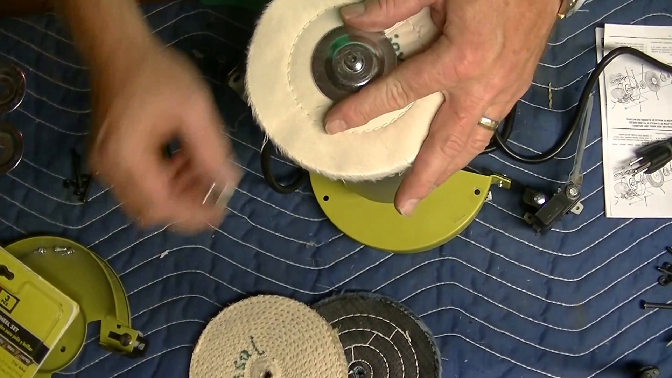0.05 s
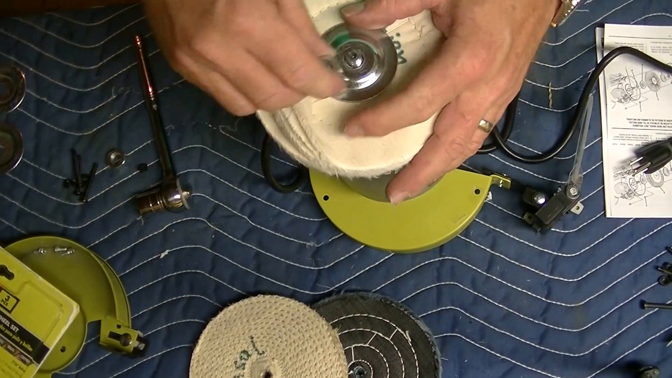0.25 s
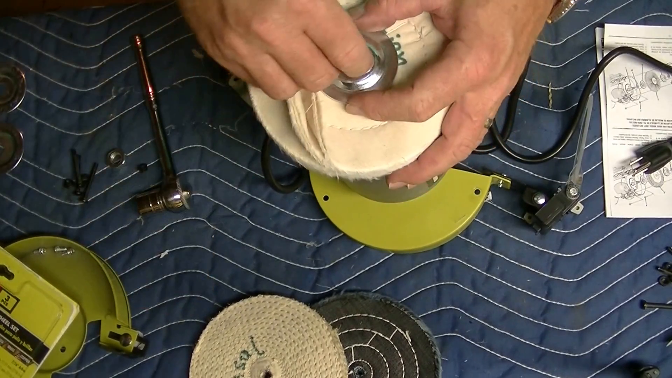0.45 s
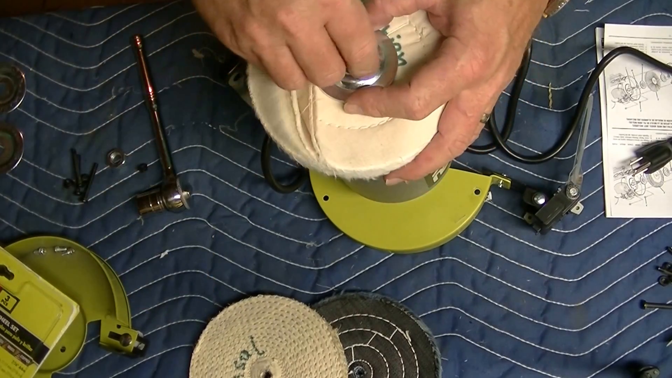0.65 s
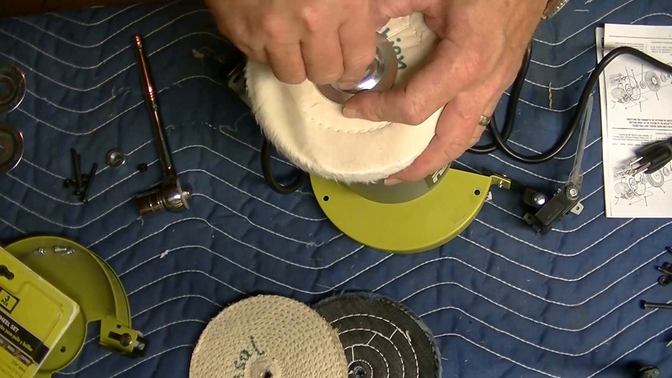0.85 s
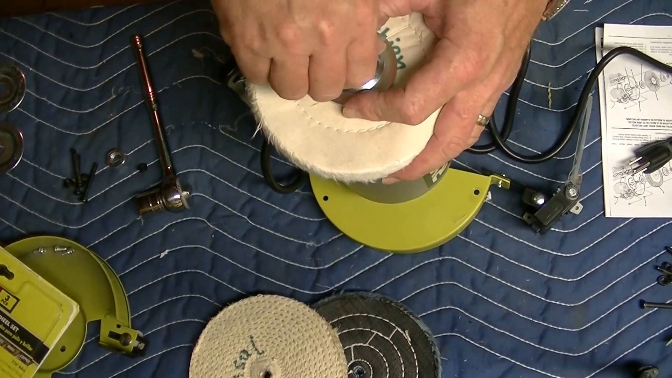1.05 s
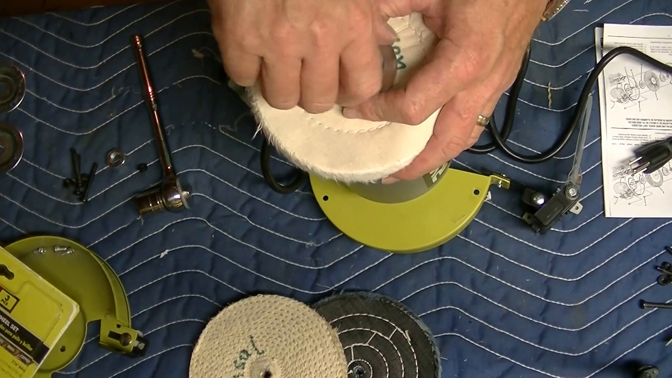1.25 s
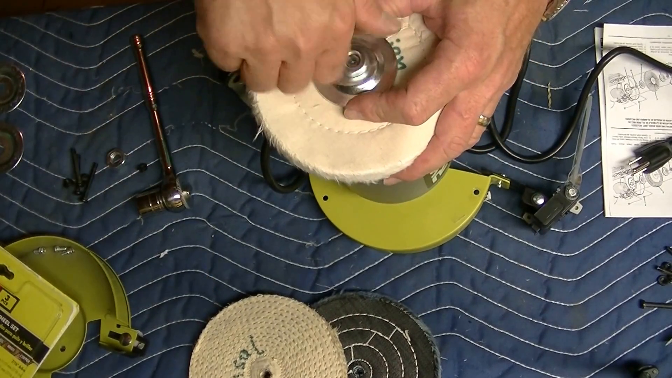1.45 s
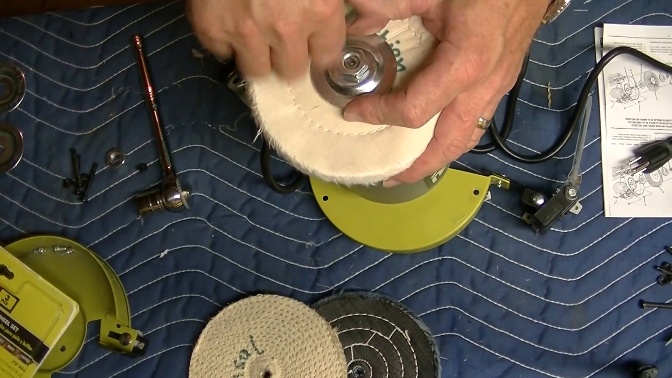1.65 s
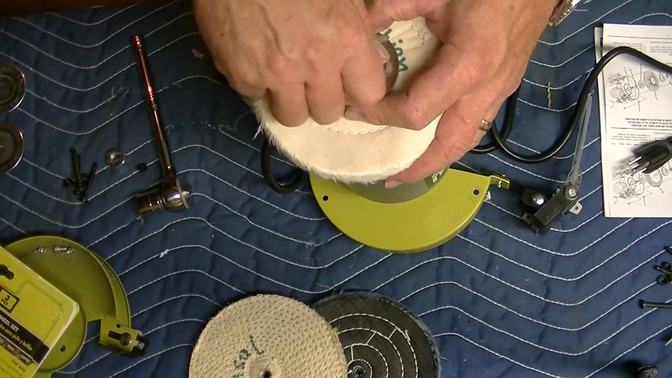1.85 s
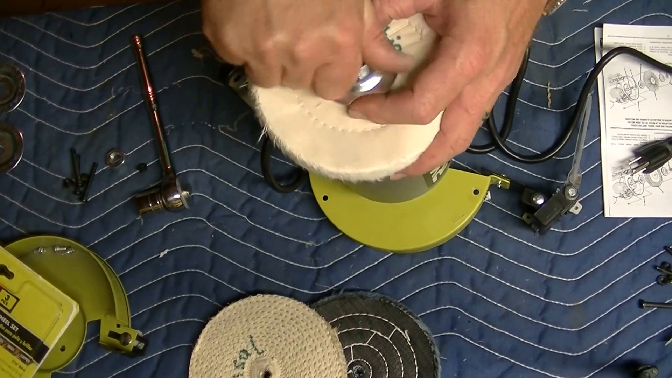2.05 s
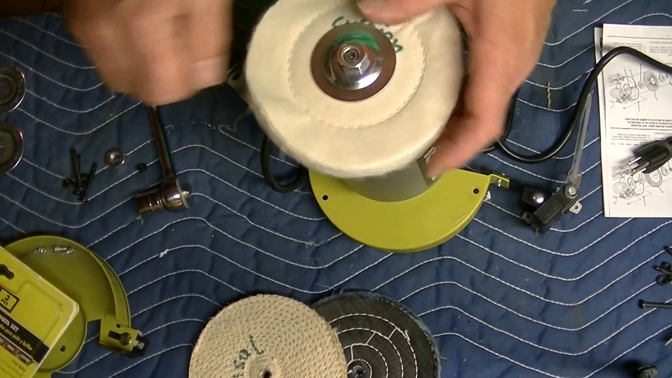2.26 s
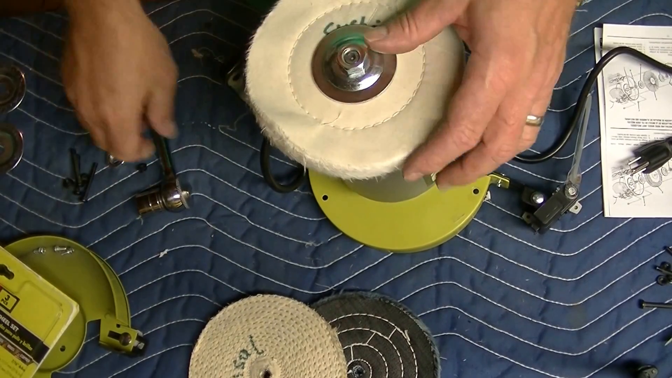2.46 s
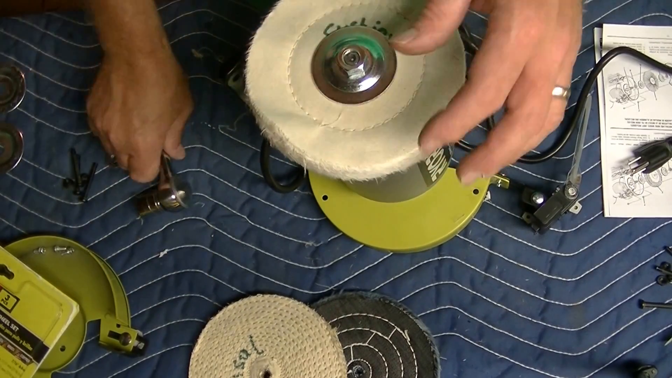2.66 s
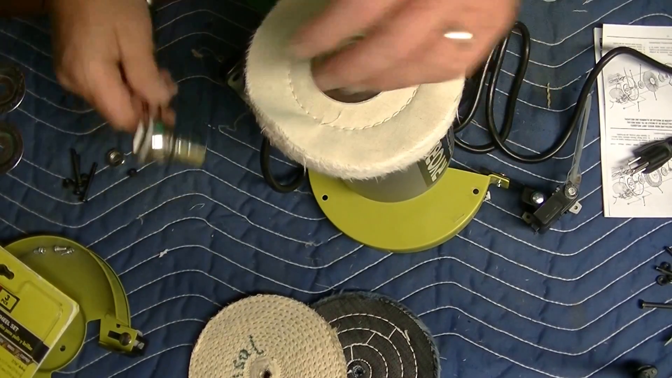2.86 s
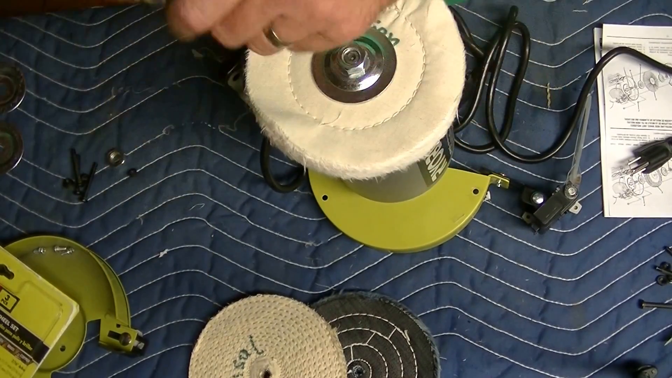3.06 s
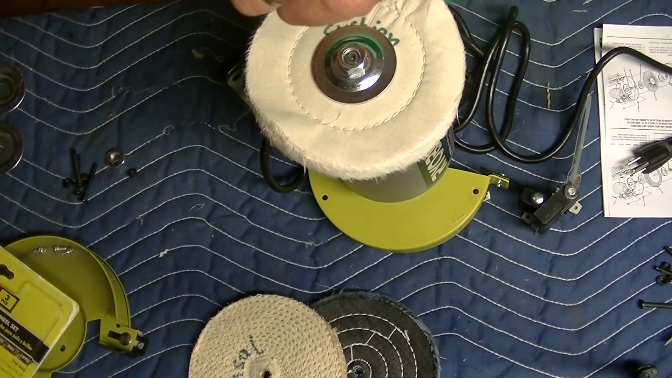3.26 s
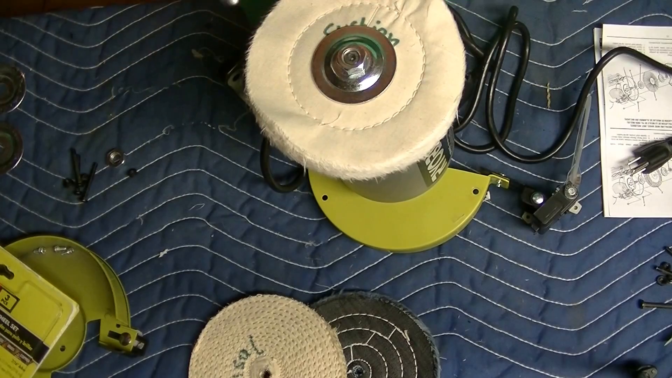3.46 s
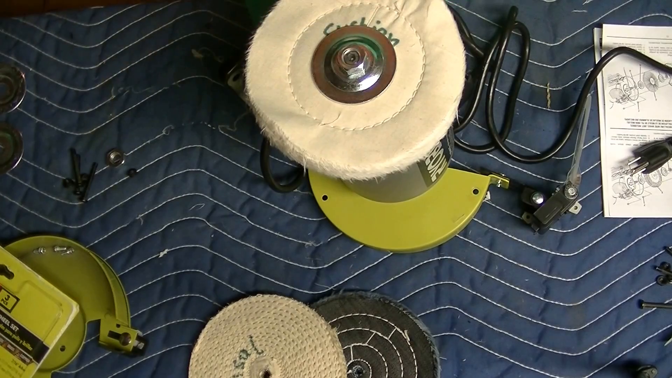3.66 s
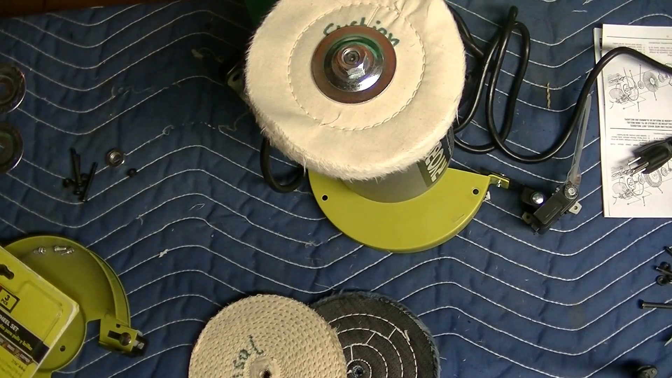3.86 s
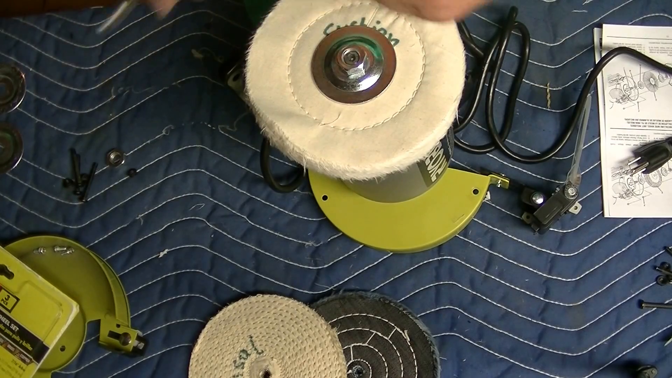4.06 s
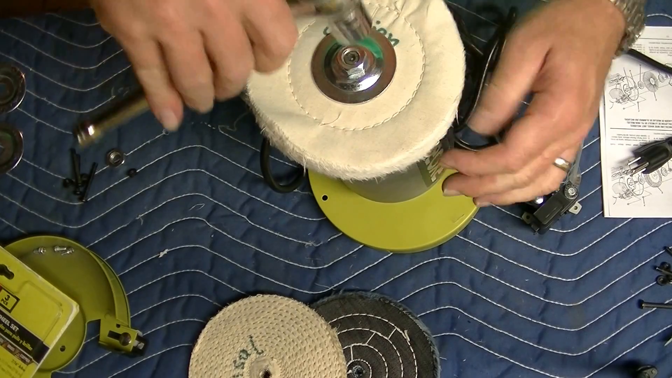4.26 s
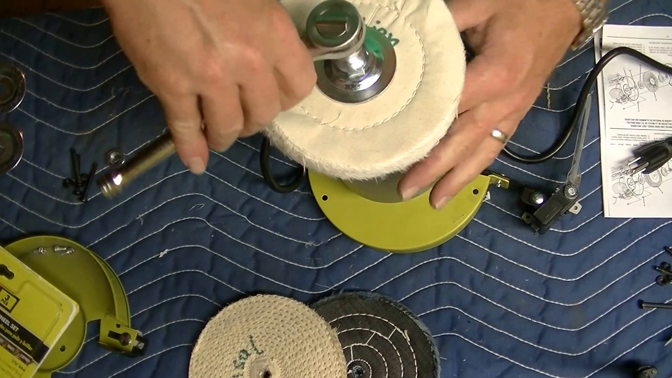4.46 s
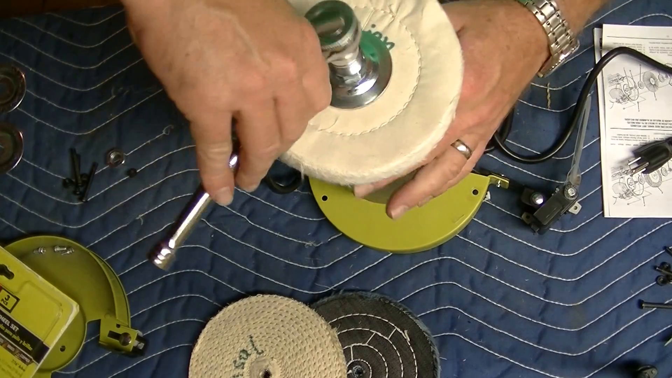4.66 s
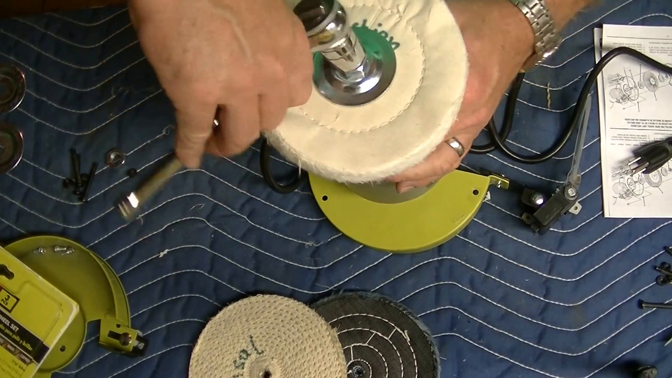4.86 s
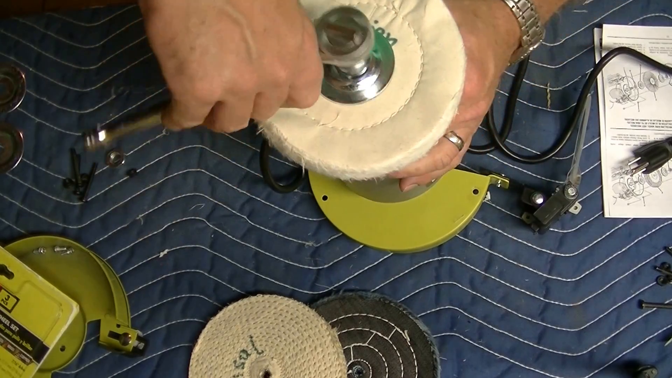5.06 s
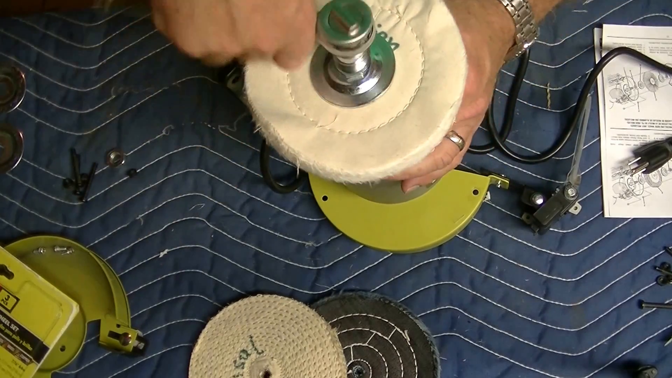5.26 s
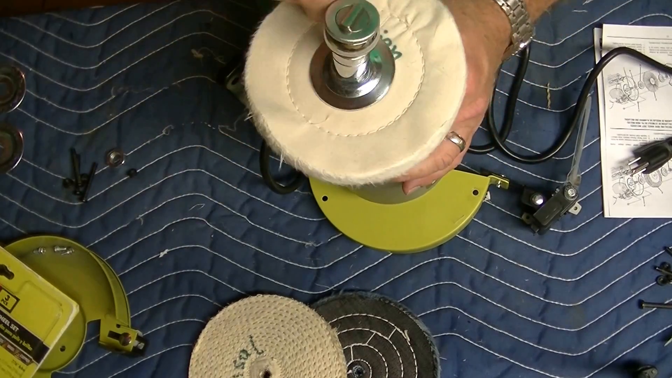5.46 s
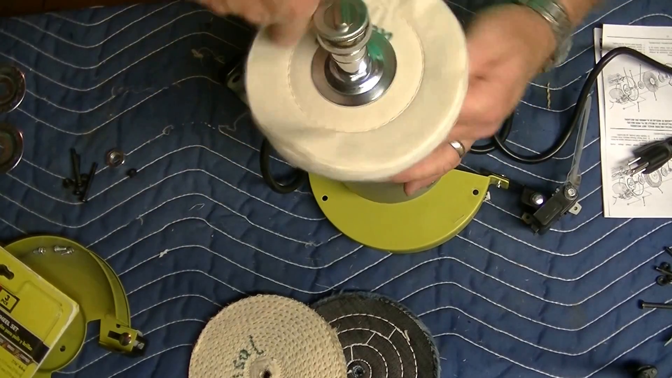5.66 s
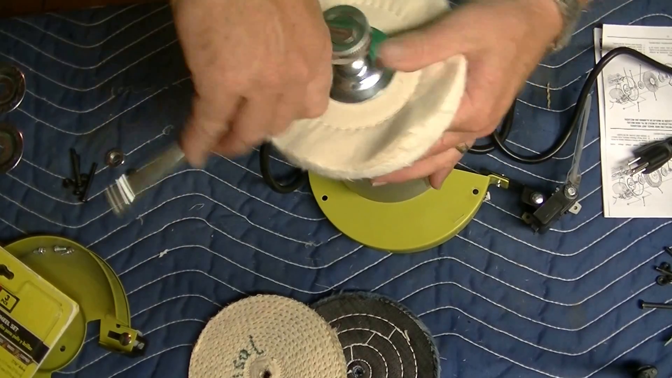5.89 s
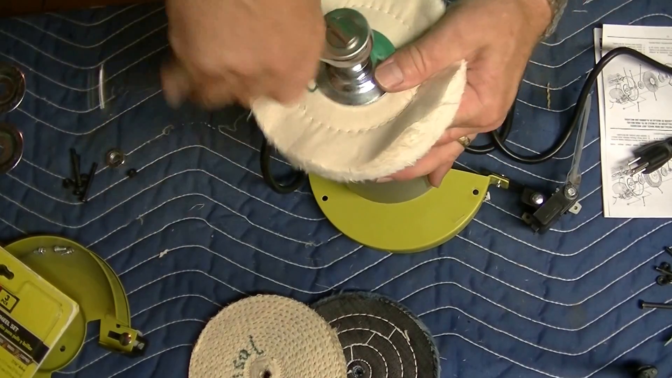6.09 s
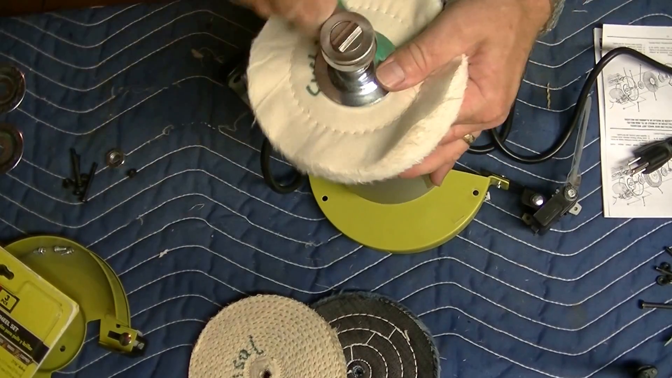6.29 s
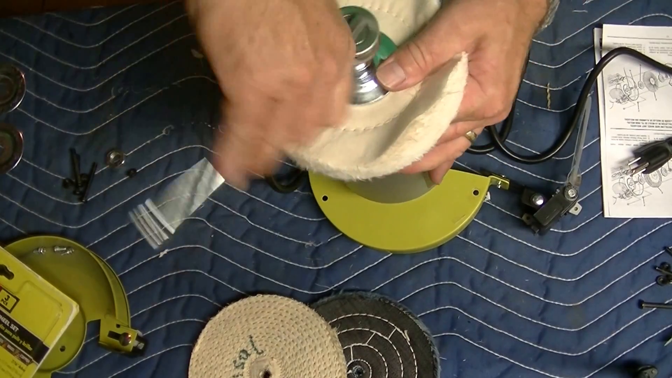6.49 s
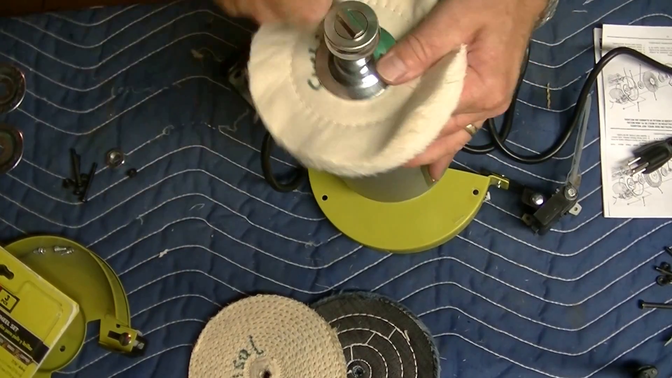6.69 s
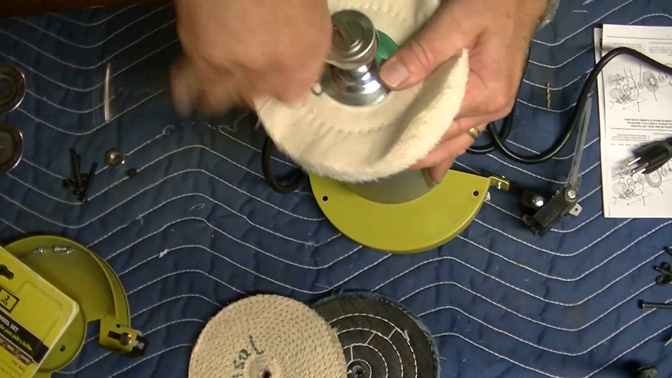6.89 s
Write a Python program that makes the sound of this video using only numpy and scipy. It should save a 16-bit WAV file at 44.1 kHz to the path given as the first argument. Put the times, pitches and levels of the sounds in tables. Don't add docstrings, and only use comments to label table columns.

```python
import sys
import numpy as np
from scipy import signal
from scipy.fft import rfft, irfft
from scipy.io import wavfile
from scipy.ndimage import uniform_filter1d

SR = 44100
rng = np.random.default_rng(int(sys.argv[2]) if len(sys.argv) > 2 else 0)


def gain_from_decibels(decibels):
    exponent = np.asarray(decibels, float) / 20
    return 10 ** exponent


def wrap_up_sound(samples):
    columns = np.atleast_2d(samples).T
    tamed = np.clip(columns, -1, 1)
    steps = np.round(tamed * 32767).astype(np.int16)
    wavfile.write(sys.argv[1], SR, steps)


N = 305613

# [f/Hz, partner f/Hz, loud moment/s, lasting t60/s, lasting share/dB]
HEAD = [(3840, 4060, 0.0067, .1, -16), (6780, 6830, 0.0067, 0.22, -15), (9867, 9730, 0.0044, 0.15, -20.5),
        (10810, 10906, 0.0062, 0.23, -16)]
# [f/Hz, level/dB, t60/s]
SIDE_RINGS = [(5420, -26.5, .025), (6400, -17, 0.01), (9040, -25.5, .02), (15750, -31, 0.012),
              (15640, -20, 0.032)]
# [f/Hz, level/dB]
CRACK = [(18, -56), (30, -34.5), (1060, -24.5), (1340, -23.5), (3210, -5), (4290, -2.5), (6050, 3),
         (8760, -6.5), (10800, -2), (12000, -21), (13000, -20.5), (15200, -15.5), (16500, -60)]
# [t/s, peak level/dB, place struck (0 low ring - 3 top ring), ring level/dB,
# lasting ring level/dB]
HELD_SNAPS = [(3.0572, -8, 1.1, -30, -20), (3.6406, -2.5, 3.06, -8.5, -7), (3.9696, -0.5, 3.05, -6.5, -27),
              (4.0152, -1.5, 2.95, -1, -15), (4.0282, 1.5, 3.2, 1, -22), (4.0387, -1, 1.7, -9, -8.5),
              (4.0474, -0.5, 2.6, 2, -12), (4.0561, 0, 2.18, 4.5, -13.5), (4.0606, -9.5, 2.05, 5, -12.5),
              (4.0666, -1, 2.2, -11, -6.5), (4.0844, -1.5, 2.9, -10.5, -8), (4.147, -11.5, 0.99, -5, -27)]
SWUNG_SNAPS = [(5.955, -8.5, 1.46, -6.5, 8), (5.9946, -7.5, 1.57, -7, 3.5), (6.336, -22.5, 1.5, -17, -1),
               (6.3406, -0.5, 0.99, -22, -4), (6.355, -7, 0.91, -13, 0), (6.3659, -3.5, 2.3, -6, -5),
               (6.3753, 1, 2.05, -11.5, -7), (6.387, -9.5, 1.1, -12, 0), (6.397, -8.5, 1.9, -7, 2),
               (6.4187, -4, 2, -8, 1), (6.429, -1, 2.7, -7, -3), (6.4373, -6, 2.35, -6, 5),
               (6.4476, -1.5, 1.9, -20, -1), (6.4593, -1, 2.1, -12, 0), (6.4718, -3.5, 1.8, -11, -7),
               (6.499, -2, 1.8, -22, -1), (6.5009, -0.5, 2.1, -10, 7), (6.7274, -15, 3.1, -6.5, -8),
               (6.7317, -5, 3.2, -7, -8), (6.7472, -2, 2.5, -5.5, -7), (6.7608, -7.5, 1.3, -6, -8),
               (6.7988, -4, 2.9, -8.5, -9), (6.808, -3, 2.1, -11.5, -2), (6.819, -5.5, 2.8, -10, -2),
               (6.828, -5, 1.2, -5, -2), (6.8405, -5, 2.1, -9, 10), (6.8581, -7, 2.53, -13.5, 14.5)]
TOUCHES = [(3.0533, -23, 1.8, -8, -15), (3.622, -39, 3, -21, -12), (3.9, -52, 3, -5, -3),
           (3.949, -28.5, 2.5, -4, -9), (3.958, -21.5, 1.3, -9, -8), (4.013, -14, 0.96, 1, -4),
           (4.849, -56, 1.9, 5, 3), (5.714, -50, 2.27, 12.5, 11), (5.79, -35, .05, 0, -1),
           (5.856, -50, 0.87, 21, -3), (5.949, -26, 2.5, -12, -1), (6.795, -13, 2.9, -16, -3)]
# [t/s, level/dB, f/Hz, length/s]
SWELLS = [
    (6.343, -27, 6930, 0.067),
    (6.369, -26.5, 4015, 0.042),
    (6.44, -23, 3840, 0.041),
    (6.466, -14, 6790, 0.023),
    (6.519, -39, 6780, 0.025),
    (6.742, -19.5, 6780, 0.045),
    (6.797, -20, 6793, 0.082),
    (6.838, -27.5, 3840, 0.039),
]

# [f/Hz, level/dB]
NUT_COLOUR = [(120, -90), (200, -58.5), (1140, -33), (2210, -2.5), (2750, -13.5), (4520, 2.5),
              (6880, -10.5), (7410, -11.5), (9060, -9.5), (16000, -45)]
# [f/Hz, level/dB]
SOCKET_COLOUR = [(120, -71), (200, -51), (1100, -22.5), (1400, -15), (2020, -10.5), (2170, -5), (5420, 0.5),
                 (7540, -16), (9580, -18), (16000, -35.5)]
# [f/Hz, level/dB, t60/s]
WASHER = [(2320, -15, 0.041), (3360, -34, 0.064), (4400, -27, 0.043), (5420, -4, 0.026)]
# [t/s, peak level/dB, strongest ring f/Hz, treble tilt/dB per octave]
NUT_KNOCKS = [(.2666, -42.5, 3400, -19.5), (.4394, -23, 5700, 3.5), (.4455, -28.5, 3740, 0),
              (.518, -38, 5440, -3), (.5538, -23, 4050, -3.5), (.592, -38, 2360, -6), (.612, -44, 4100, -7),
              (.709, -47, 2320, -5), (.6814, -37, 2400, -10), (.7133, -14, 4480, -3),
              (.7843, -30.5, 4400, -13), (.8286, -39.5, 4520, -9), (.888, -34, 2180, -8),
              (.9124, -28, 2070, -5), (1.0036, -10, 3530, 0.5), (1.4961, -19.5, 5460, -3),
              (1.5036, -14, 4490, -5), (1.8044, -37.5, 3980, -3.5), (1.9405, -38, 3580, -6),
              (2.0073, -41.5, 3600, -12), (2.0283, -40, 2070, -10), (2.041, -42, 2520, -13),
              (2.0605, -45, 4790, 6), (2.071, -49, 2530, -16), (2.131, -45, 5200, 2),
              (2.228, -47.5, 5140, -22)]
FITTING_KNOCKS = [(2.5915, -32.5, 4640, 1), (2.6294, -33, 4100, 7), (2.775, -43.5, 4400, 3),
                  (3.013, -35.5, 5300, -5), (3.5414, -38.5, 5830, 0), (4.4897, -5, 5420, 0),
                  (4.4959, -4.5, 5410, 0), (4.603, -30.5, 2500, -6.5), (4.6297, -21.5, 2390, -3.5),
                  (4.655, -38, 5650, -7), (4.667, -28, 3050, -2), (4.683, -43, 1690, -8),
                  (4.6908, -32.5, 2840, -8.5), (4.7283, -34.5, 5180, 3), (4.782, -31.5, 2600, -4.5),
                  (4.8801, -42, 3020, -5), (4.996, -25.5, 5550, -3.5), (5.0087, -22, 2244, -4.5),
                  (5.0625, -31, 3130, -2), (5.1273, -24.5, 5940, 7)]
LOADED_KNOCKS = [(5.2536, -18.5, 3020, -6), (5.2628, -15, 4690, 0.5), (5.3458, -17, 3560, -1),
                 (5.3617, -21.5, 2720, -9), (5.4139, -24, 3750, -3.5), (5.4339, -26.5, 2130, -6),
                 (5.474, -16.5, 5500, -8.5), (5.617, -27, 5346, -4), (5.63, -30.5, 3640, -4.5),
                 (5.6412, -14, 3830, -4), (5.698, -18.5, 2170, -0.5), (5.7067, -20.5, 5490, 0),
                 (5.7839, -28, 4780, -9), (5.7909, -24.5, 3770, -2), (5.8511, -9.5, 5230, 0.5),
                 (6.055, -28, 2670, -8.5), (6.2382, -21.5, 5220, -2.5), (6.247, -30.5, 5630, -11),
                 (6.3008, -25, 1890, -5), (6.3106, -24, 5100, -4), (6.6465, -29, 4480, -4.5),
                 (6.6935, -26, 3700, 11), (6.703, -19.5, 3640, -4), (6.888, -14.5, 2500, -2),
                 (6.9124, -15.5, 5660, -3.5)]
# [t/s, peak level/dB]
CONTACTS = [(0.44, -27), (1.003, -21), (1.7574, -28), (2.06, -27), (4.4895, -1), (4.783, -20), (5.127, -13),
            (5.2534, -14), (5.347, -8), (5.3617, -33), (5.434, -23), (5.475, 0), (5.591, -29),
            (5.8514, 1.5), (6.6947, -10), (6.914, -9)]
# [t/s,
# level/dB, f/Hz, t60/s]
SINGING = [(0.439, -24, 5410, 0.038), (0.518, -53, 2310, 0.31), (0.519, -46, 5470, 0.063),
           (0.5547, -40.5, 2450, 0.069), (1.031, -45, 3315, .3), (1.506, -30, 4050, 0.084),
           (2.027, -41.5, 1170, 0.016), (2.04, -45, 1050, 0.015), (3.06, -17, 6520, 0.022),
           (4.089, -22, 6090, 0.032), (3.332, -50, 2940, 0.033), (3.365, -47.5, 2960, 0.047),
           (4.625, -47, 11530, 0.036), (4.729, -34.5, 5560, 0.034), (4.995, -27.5, 5650, 0.038),
           (4.996, -47, 8000, .07), (5.264, -38, 8780, 0.09), (5.688, -43, 11400, 0.15),
           (5.699, -38, 5480, 0.27), (5.885, -54, 10000, 0.29), (6.693, -22, 8000, 0.021),
           (6.913, -20, 6320, 0.031), (6.914, -17, 4630, 0.027)]

# [t/s, level/dB, hum f/Hz]
SLIDE = [
    (2.64, -65, 4250),
    (2.7, -65, 4230),
    (2.79, -67, 4130),
    (2.86, -63, 4100),
    (2.93, -59.5, 4130),
    (2.99, -60.5, 4200),
    (3.03, -67, 4350),
]
# [f/Hz, level/dB]
SLIDE_COLOUR = [(2000, -21.5), (3700, -7), (4150, -9), (5300, -5), (6500, -16), (12000, -44)]
# [t/s, level/dB, resonance f/Hz]
GUIDING = [
    (4.159, -50, 4900),
    (4.23, -54, 4950),
    (4.285, -53, 4990),
    (4.31, -57.5, 4700),
    (4.36, -55, 4800),
    (4.43, -55, 4680),
    (4.49, -57, 4830),
]
# [t/s, level/dB]
RUBS = [
    [(0.0, -90), (0.264, -62), (0.42, -88)],
    [(0.5, -54), (0.644, -93), (0.976, -58.5), (1.562, -69), (1.79, -80), (1.83, -59.5), (1.92, -67.5),
     (2.04, -61.5), (2.3, -70)],
    [(2.55, -67), (2.628, -52), (2.8, -70.5)],
    [(4.55, -75), (4.898, -62.5), (5.248, -55), (5.93, -55.5)],
    [(6.0, -50), (6.14, -58), (6.33, -61)],
]
# [f/Hz, level/dB]
RUB_COLOUR = [(110, -34), (180, -22), (300, -27), (492, 0.5), (629, -57), (781, -3), (1200, -9),
              (2410, 0.5), (5300, 6), (12000, -15.5), (15600, -66), (22000, -120)]
# [t/s, level/dB]
SCRAPE = [
    [(1.35, -80), (1.376, -49), (1.433, -35.5)],
    [(1.433, -33), (1.489, -74), (1.495, -43)],
]
# [f/Hz, level/dB]
BINDING_COLOUR = [(410, -64), (700, -31), (1180, -25), (2190, -3.5), (2990, -11.5), (4470, 0), (5810, -7),
                  (7370, -23), (12000, -33), (15600, -66), (22000, -120)]
# [t/s, peak level/dB]
JOLTS = [
    (0.7144, -72),
    (3.0572, -65),
    (3.641, -50),
    (3.9715, -46),
    (5.955, -56),
]

# [t/s, peak level/dB, low ring level/dB, high ring
# level/dB]
TICKS = [(0.762, -40, -51, -52), (0.803, -41, -50, -40.5), (0.8383, -48, -53, -56),
         (0.871, -48, -55, -60), (0.914, -51, -44, -56), (0.945, -54, -61, -60),
         (0.9806, -36, -59, -53), (1.045, -49, -54, -60), (1.112, -36, -58, -56),
         (1.1483, -36, -66, -53), (1.179, -35, -56, -58), (1.205, -46, -64, -54),
         (1.244, -36, -58, -53), (1.2715, -45, -65, -52), (1.311, -42, -56, -55),
         (1.3384, -49, -63, -57), (1.5444, -48, -64, -57), (1.5788, -36, -57, -59),
         (1.606, -47, -63, -51), (1.6453, -40, -55, -57), (1.671, -51, -52, -58),
         (1.8721, -49, -65, -59), (2.1564, -58, -71, -61), (2.3216, -56, -74, -59),
         (2.8212, -33.5, -47, -41.5), (2.857, -47, -58, -55), (2.89, -50, -54, -58),
              (2.9228, -53, -62, -58), (2.957, -45, -71, -53), (2.9987, -37, -59, -51),
              (3.023, -51, -64, -64), (3.09, -50, -66, -53), (3.123, -50, -61, -56),
              (3.1304, -39, -57, -59), (3.1577, -41, -69, -59), (3.1908, -48, -57, -60),
              (3.198, -37, -57, -53), (3.2233, -46, -64, -59), (3.257, -41, -64, -59),
              (3.263, -38, -59, -55), (3.291, -46, -60, -58), (3.3224, -52, -58, -62),
              (3.3566, -55, -59, -67), (3.7403, -52, -72, -55), (3.7715, -49, -73, -58),
              (3.806, -59, -70, -55), (3.84, -50, -71, -62), (3.856, -57, -70, -61),
              (3.8905, -54, -72, -59), (3.923, -56, -68, -57)]
# [t/s, peak level/dB]
THUMPS = [(.748, -75), (.948, -70), (2.108, -69), (2.225, -67), (2.602, -54.5), (4.426, -72), (4.512, -62),
          (4.902, -67.5), (5.02, -62), (5.27, -59.5), (5.377, -59), (5.482, -57), (5.8, -60.5),
          (5.859, -61.5), (6.066, -70), (6.175, -63), (6.519, -55.5)]
# [f/Hz, level/dB]
FLOOR = [(15, -69), (25, -10.5), (220, -34), (259, -8), (313, -9), (399, -5), (433, -8), (496, -8.5),
         (1150, -13), (3150, -6), (4020, -10.5), (4990, -6), (7710, -11), (15200, -18), (16500, -43)]
# [f/Hz, likeness (-1 to 1)]
SAME = [(60, -1.3), (240, -0.64), (950, -0.71), (3770, 0.68), (15000, 1)]
# [f/Hz, t60/s]
ROOM = [(200, 0.24), (1400, 0.21), (4000, 0.23), (10000, 0.19), (16000, 0.054)]
# [f/Hz, ratio]
APART = [(100, 1.2), (500, 1.1), (2000, 1.15), (6000, 0.3), (11500, .19), (14000, .55)]

SEATED_S = 5


def ratchet():
    out, t = np.zeros(N), np.arange(9500) / SR
    rise = 1 - np.exp(-t / 0.00044)
    tooth = sharp_point(CRACK)
    snaps = HELD_SNAPS + SWUNG_SNAPS
    starts = np.sort([row[0] for row in snaps] + [np.inf])
    for s, db, place, near_db, lasting_db in snaps + TOUCHES:
        held = s < SEATED_S
        free = .35 if held else 1
        rings = head_rings(t, place, near_db, lasting_db, held, free)
        gap = starts[starts > s + .003][0] - s
        rings *= gain_from_decibels(-13 / np.sqrt(free) * np.clip((t - gap) / .002, 0, 1))
        tail_db, tilt_db = (-7, 2) if held else (-0.5, 0)
        shape = hold(t, .0019 - 0.00036 * free) + gain_from_decibels(tail_db) * fade(t, 0.06)
        crack = struck(rise * shape, CRACK, tilt_db)
        add(out, s - .0003, gain_from_decibels(db - 4.5) * (gain_from_decibels(-0.5) * crack + rings * rise))
        add(out, s - 30 / SR, gain_from_decibels(db - 2.5) * tooth)
    return out


def head_rings(t, place, near_db, lasting_db, held, free):
    phase = 2 * np.pi * rng.random(13)
    detune = 1 + 0.0021 * rng.standard_normal(13)
    away = np.arange(len(HEAD)) - place
    far_db = -12.5 - 3.5 * held - max(near_db, 0)
    struck_db = near_db + far_db * (1 - np.exp(-(away / 0.84) ** 2))
    struck_db += 0.5 * rng.standard_normal(len(HEAD))
    struck_db[0] -= 7.5 * held
    rings = np.zeros(len(t))
    for k, (hz, pair_hz, quick, lasting, share_db) in enumerate(HEAD):
        partner_level = 0.32 + 0.36 * phase[k + 8] / (2 * np.pi)
        pair = np.sin(2 * np.pi * hz * detune[k] * t + phase[k])
        pair += partner_level * np.sin(2 * np.pi * pair_hz * detune[k + 4] * t + phase[k + 4])
        t60 = lasting * (np.sqrt(free) if k < 2 else 1)
        decay = hold(t, free ** .3 * quick) + gain_from_decibels(share_db + lasting_db - 2.0) * fade(t, t60)
        rings += gain_from_decibels(struck_db[k] + 2.0) * pair * chatter(len(t), 4 * free) * decay
    for k, (hz, ring_db, t60) in enumerate(SIDE_RINGS):
        ring = np.sin(2 * np.pi * hz * detune[k + 8] ** 8 * t + phase[k + 8])
        rings += gain_from_decibels(ring_db) * ring * fade(t, t60)
    return rings


def swells():
    out = np.zeros(N)
    for s, db, hz, length in SWELLS:
        t = np.arange(0, length, 1 / SR)
        ring = np.sin(2 * np.pi * (hz * t + rng.random())) * chatter(len(t), 3.27)
        add(out, s, gain_from_decibels(db) * ring * signal.windows.tukey(len(t), .6))
    return out


def knocks():
    out, t = np.zeros(N), np.arange(5500) / SR
    rise = 1 - np.exp(-t / 0.00022)
    groups = (NUT_KNOCKS, 0.056), (FITTING_KNOCKS, 0.07), (LOADED_KNOCKS, 0.049)
    for s, db, hz, tilt_db, middling in [row + (t60,) for rows, t60 in groups for row in rows]:
        t60 = middling * gain_from_decibels(0.1463 * (-7.5 - db))
        by_hand = s < 2.4
        colour = NUT_COLOUR if by_hand else SOCKET_COLOUR
        uneven = chatter(len(t), 1.84, 50)
        rattle = struck(rise * uneven * fade(t, t60), colour, tilt_db)
        phase, chance_db = 2 * np.pi * rng.random(5), 1.4 * rng.standard_normal(4)
        rings = np.sin(2 * np.pi * hz * t + phase[4]) * fade(t, 0.4 * t60)
        for k, (ring_hz, ring_db, ring_t60) in enumerate(WASHER if by_hand else []):
            ring = np.sin(2 * np.pi * ring_hz * t + phase[k])
            rings += gain_from_decibels(ring_db + chance_db[k]) * ring * fade(t, ring_t60)
        add(out, s - .0003, gain_from_decibels(db - 6.0) * (rattle + 0.5 * rings * (1 - np.exp(-t / 0.00034))))
    return out


def contacts():
    out = np.zeros(N)
    point = sharp_point(SOCKET_COLOUR, 1.2)
    for s, db in CONTACTS:
        add(out, s - 30 / SR, gain_from_decibels(db - 5.5) * point)
    return out


def singing():
    out, t = np.zeros(N), np.arange(5500) / SR
    for s, db, hz, t60 in SINGING:
        rough = chatter(len(t), 3.58)
        wander = .04 * np.cumsum(np.log(rough)) / SR
        tone = np.sin(2 * np.pi * hz * (t + wander))
        tone += 0.35 * np.sin(2 * np.pi * (0.8 * hz * t + rng.random()))
        shape = fade(t, t60) * (1 - np.exp(-t / 0.001)) * signal.windows.tukey(len(t), .01)
        add(out, s, gain_from_decibels(db - 3) * tone * rough * shape)
    return out


def sliding():
    s, slips = rubbing([row[:2] for row in SLIDE], SLIDE_COLOUR, 9000, 1.3)
    times, _, hz = np.transpose(SLIDE)
    hum_hz = np.interp(s + np.arange(len(slips)) / SR, times, hz)
    hum = resonate(slips, hum_hz, 150)
    return s, gain_from_decibels(-3.5) * slips + hum * np.std(slips) / np.std(hum)


def guiding():
    out = np.zeros(N)
    s, level_db, hz = np.transpose(GUIDING)
    t = np.arange(s[0], s[-1], 1 / SR)
    slips = rng.standard_normal(len(t)) * chatter(len(t), 1.7)
    upper_hz = np.interp(t, s, hz)
    hollow_hz, hollow_width_hz = 1870, 230
    upper = resonate(resonate(slips, upper_hz, 1000), upper_hz, 2000)
    hollow = resonate(resonate(slips, hollow_hz, hollow_width_hz), hollow_hz, hollow_width_hz)
    hiss = evened(upper) + gain_from_decibels(-20) * evened(hollow)
    add(out, s[0], gain_from_decibels(np.interp(t, s, level_db)) * hiss * signal.windows.tukey(len(t), .1))
    return out


def hands():
    out = np.zeros(N)
    for rows in RUBS:
        add(out, *rubbing(rows, RUB_COLOUR, 5000, 3.4))
    add(out, *rubbing(sum(SCRAPE, []), BINDING_COLOUR, 5700, 1.2))
    add(out, *sliding())
    return out


def rubbing(rows, colour, grains_per_s, spread_db):
    s, level_db = np.transpose(rows)
    t = np.arange(s[0], s[-1], 1 / SR)
    draw, size, sign = rng.random((len(t), 3)).T
    slips = (draw < grains_per_s / SR) * gain_from_decibels(-spread_db * np.log(size + 0.0077)) * (sign - .5)
    level = gain_from_decibels(np.interp(t, s, level_db))
    return s[0], level * coloured(slips, colour) * signal.windows.tukey(len(t), .1)


def jolts():
    out = np.zeros(N)
    u = np.arange(1500) / SR / .0009
    for s, db in JOLTS:
        add(out, s, gain_from_decibels(db) * peaked(u * np.exp(-u)))
    return out


def ticks():
    out, t = np.zeros(N), np.arange(1500) / SR
    # [f/Hz, level/dB]
    housing = [(900, -34), (1600, 3.5), (2000, 1.0), (2500, 4.0), (3100, -2.0), (8000, -12.5), (12000, -36)]
    shape = fade(t, 0.033) * (1 - np.exp(-t / 0.0003))
    for s, db, low_db, high_db in TICKS:
        detune = 1 + np.array([[.05], [.02]]) * rng.standard_normal((2, 1))
        hz = np.array([[1593], [2450]]) * detune
        rings = gain_from_decibels([low_db, high_db]) @ np.sin(2 * np.pi * (hz * t + rng.random((2, 1))))
        buzz = struck(shape * fade(t, 0.068), housing)
        add(out, s - .001, gain_from_decibels(db - 6) * buzz + rings * peaked(shape))
    return out


def bench():
    out, t = np.zeros(N), np.arange(12000) / SR
    for s, db in THUMPS:
        boom = np.sin(2 * np.pi * 176.6 * (1 + 0.049 * rng.standard_normal()) * t)
        boom += 0.59 * np.sin(2 * np.pi * (212 * t + rng.random()))
        slow = uniform_filter1d(uniform_filter1d(rng.standard_normal(len(t)), 400), 400)
        wobble = gain_from_decibels(3 * evened(slow))
        shape = fade(t, 0.27) * (1 - np.exp(-t / 0.0014))
        add(out, s, gain_from_decibels(db - 0.5) * peaked(boom * wobble * shape))
    stir_colour = [(15, -20), (40, -7), (120, -5), (170, 0), (210, -8), (300, -40)]  # [f/Hz, level/dB]
    return out + gain_from_decibels(-93.5) * coloured(rng.standard_normal(N), stir_colour)


def workshop(x):
    taps = np.zeros((2, SR // 2))
    at = np.arange(150, SR // 2 - 20, 20)
    at = at + rng.integers(0, 20, (2, len(at)))
    np.put_along_axis(taps, at, rng.choice([-1., 1.], at.shape), 1)
    hz, t, z = signal.stft(taps, SR, nperseg=128)
    both, differ = z * gain_from_decibels(-60 * t / read(ROOM, hz)[:, None])
    differ = differ * read(APART, hz)[:, None]
    tail = signal.istft(np.array([both + differ, both - differ]), SR, nperseg=128)[1]
    return signal.fftconvolve(x[None], tail / np.linalg.norm(tail.mean(0)), axes=1)[:, :N]


def floor():
    frames, hz = N // 256 + 5, np.fft.rfftfreq(1024, 1 / SR)
    a, b, c, d, patches = rng.standard_normal((frames, 513, 5)).T
    patches = evened(uniform_filter1d(uniform_filter1d(patches, 12, 0), 10, 1))
    same = np.clip(read(SAME, hz), -1, 1)[:, None]
    left = a + 1j * b
    right = same * left + np.sqrt(1 - same ** 2) * (c + 1j * d)
    z = np.array([left, right]) * gain_from_decibels(read(FLOOR, hz)[:, None] + 0.37 * patches)
    return gain_from_decibels(-61) * evened(signal.istft(z, nperseg=1024, noverlap=768)[1][:, :N])


def evened(x):
    return x / np.sqrt(np.mean(x ** 2) + 1e-20)


def peaked(x):
    return x / (np.max(abs(x)) + 1e-20)


def read(points, hz):
    f, value = np.transpose(points)
    return np.interp(np.log(hz + 1), np.log(f + 1), value)


def add(mix, s, sound):
    part = mix[round(s * SR):][:len(sound)]
    part += sound[:len(part)]


def fade(t, t60):
    return gain_from_decibels(-60 * t / max(t60, .002))


def hold(t, length):
    return np.exp(-(t / max(length, .001)) ** 2)


def chatter(count, rough_db, smooth=120):
    return gain_from_decibels(rough_db * evened(uniform_filter1d(rng.standard_normal(count), smooth)))


def coloured(x, points, tilt_db=0):
    hz = np.fft.rfftfreq(len(x), 1 / SR)
    gain = gain_from_decibels(read(points, hz) + tilt_db * np.log2(hz / 4000 + 0.074))
    return evened(irfft(rfft(x) * gain, len(x)))


def struck(envelope, points, tilt_db=0):
    burst = coloured(rng.standard_normal(len(envelope)) * envelope, points, tilt_db)
    return peaked(burst) * np.clip(np.arange(len(burst))[::-1] / 300 - 1, 0, 1) ** 2


def sharp_point(points, tilt_db=0):
    click = coloured(np.arange(600) == 40, points, tilt_db)
    return peaked(click) * signal.windows.tukey(600, .12)


def resonate(x, hz, width_hz):
    turn = np.exp(2j * np.pi * np.cumsum(hz * np.ones(len(x))) / SR)
    r = np.exp(-np.pi * width_hz / SR)
    return 2 * (turn * signal.lfilter([1 - r], [1, -r], x / turn)).real


def scene():
    near = ratchet() + swells() + knocks() + contacts() + singing() + hands()
    top = bench()
    mix = near * gain_from_decibels([[-.2], [.2]]) + guiding() + jolts() * gain_from_decibels([[1.5], [-1.5]])
    mix += ticks() + top * gain_from_decibels([[-.6], [.6]])
    return mix + gain_from_decibels(-13.0) * workshop(near + 1.8 * top) + floor()


def band_limit(x):
    return signal.sosfilt(signal.butter(12, 17130, fs=SR, output="sos"), x)


def record(dry):
    bent = .95 * np.tanh(dry / .95)
    band = signal.firwin(127, 15900, window=("kaiser", 5), fs=SR)
    limited = signal.oaconvolve(bent, band[None], "same")
    return band_limit(limited)


dry = scene()
out = record(dry)
wrap_up_sound(out)
```